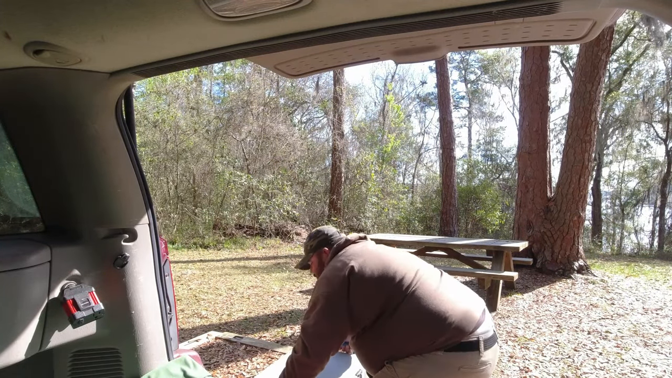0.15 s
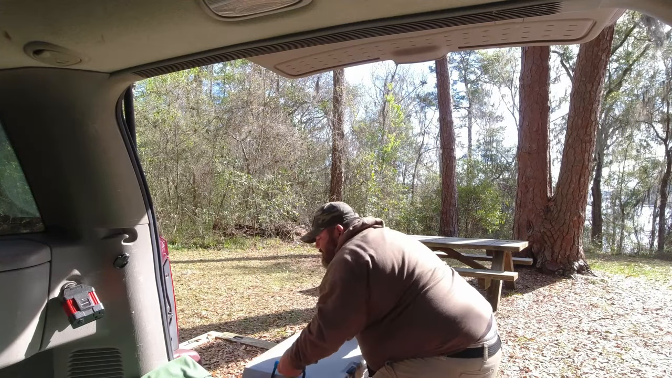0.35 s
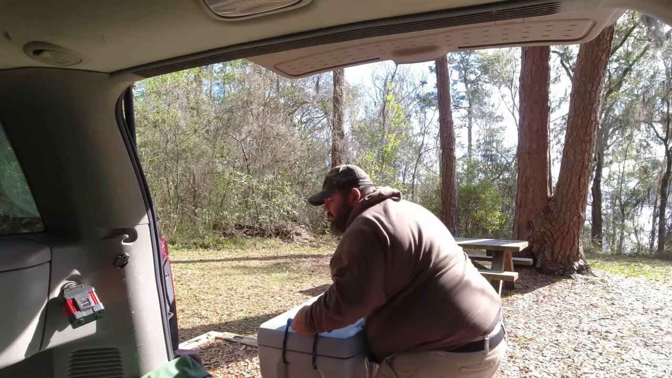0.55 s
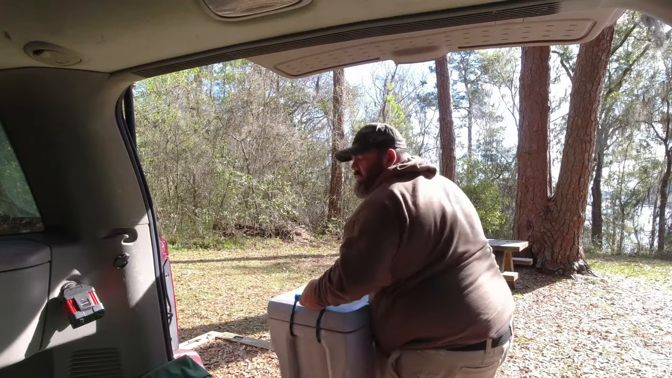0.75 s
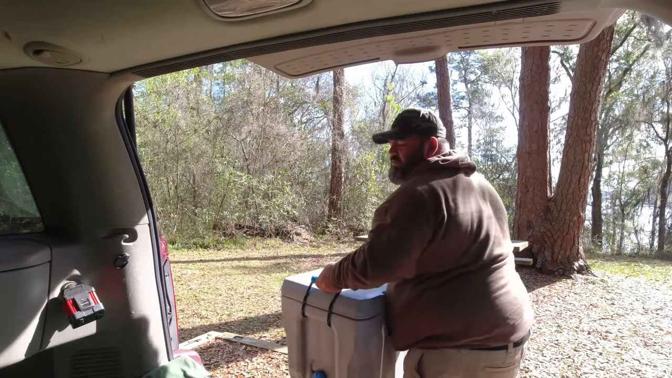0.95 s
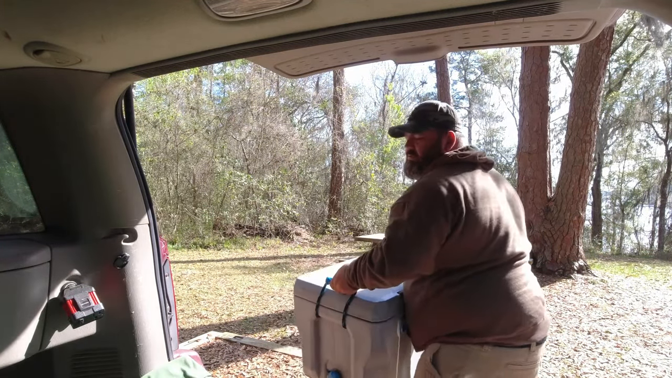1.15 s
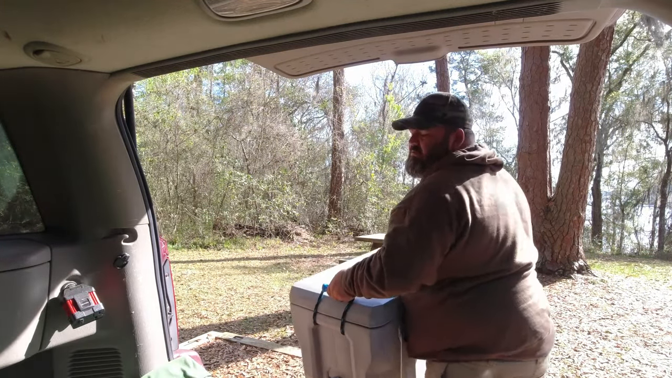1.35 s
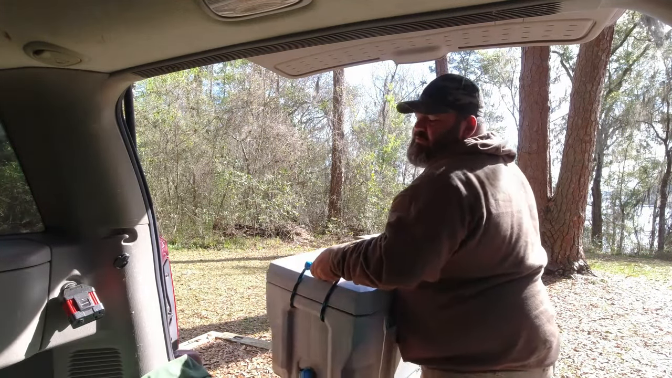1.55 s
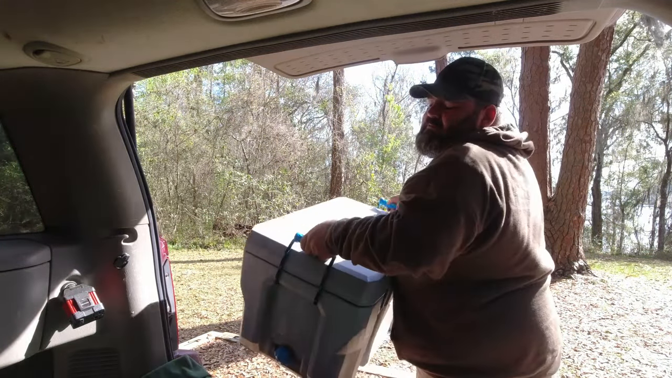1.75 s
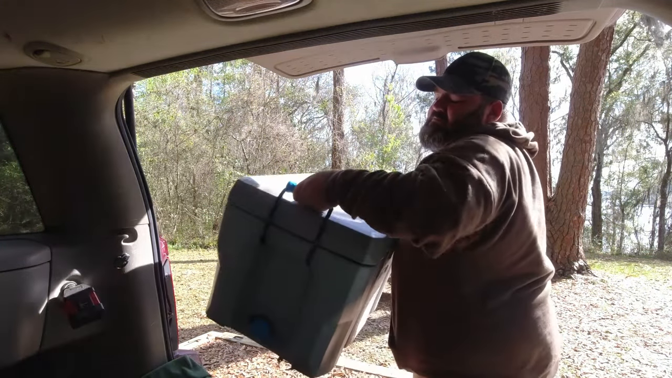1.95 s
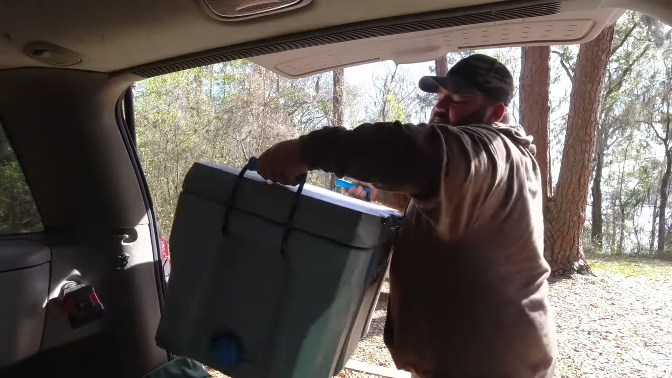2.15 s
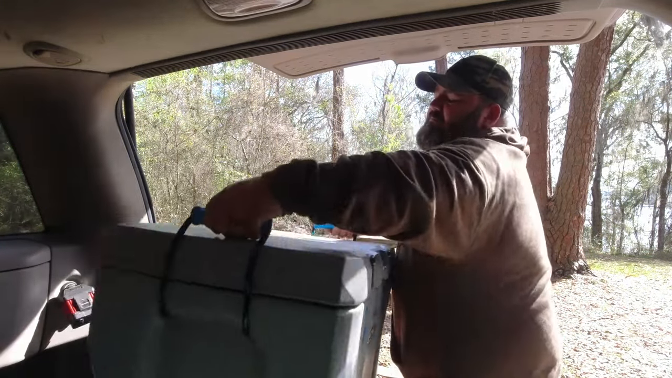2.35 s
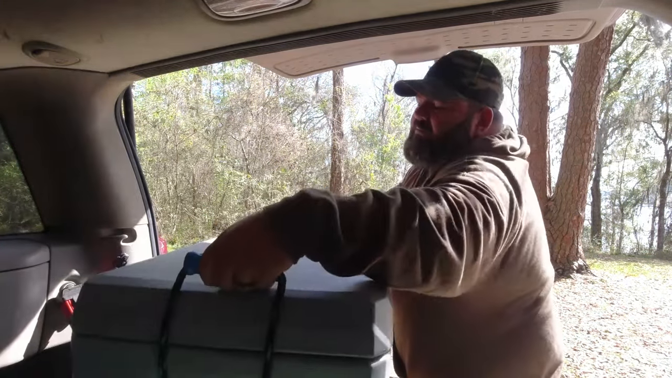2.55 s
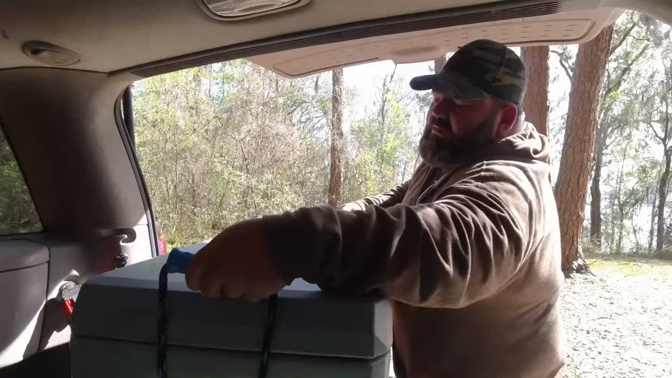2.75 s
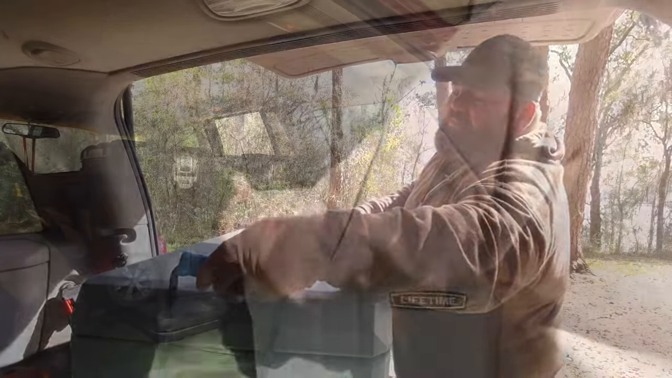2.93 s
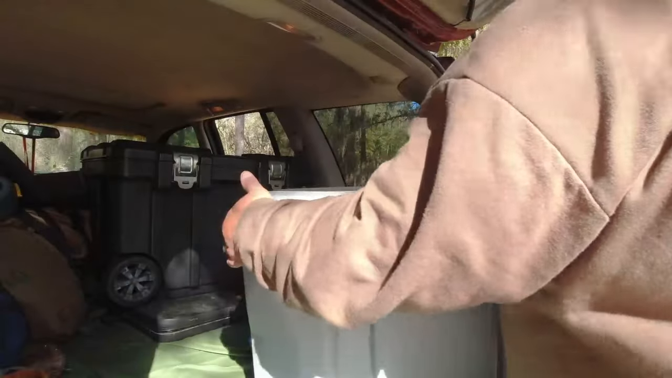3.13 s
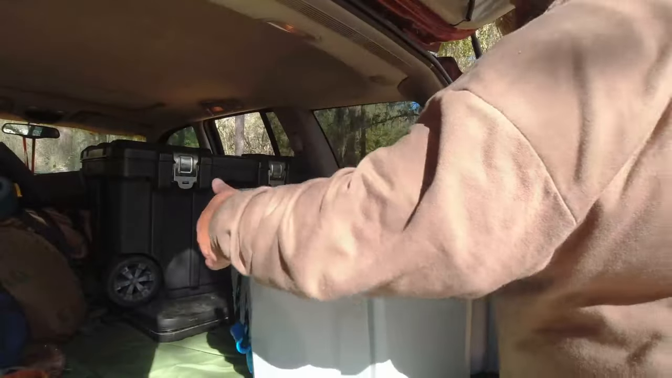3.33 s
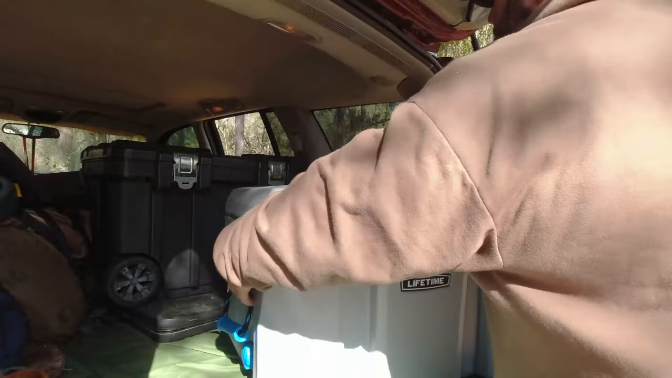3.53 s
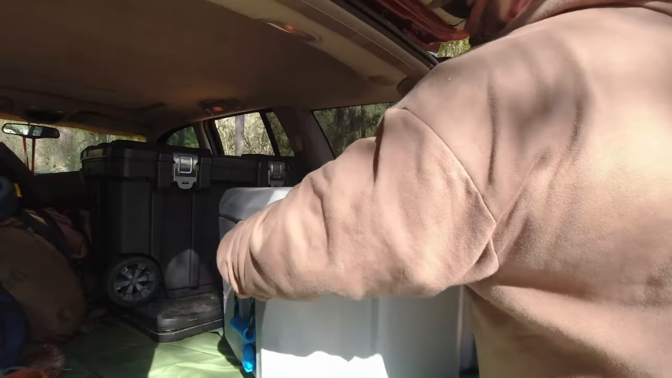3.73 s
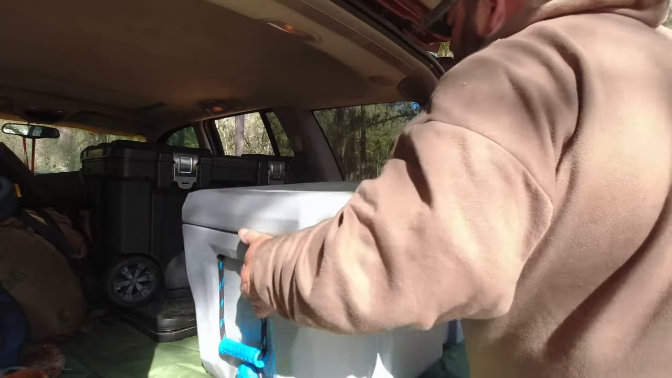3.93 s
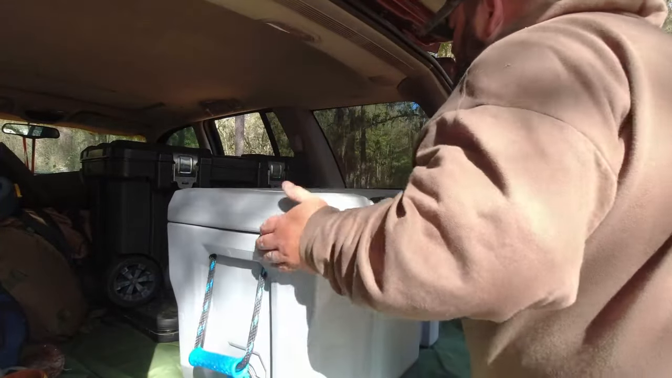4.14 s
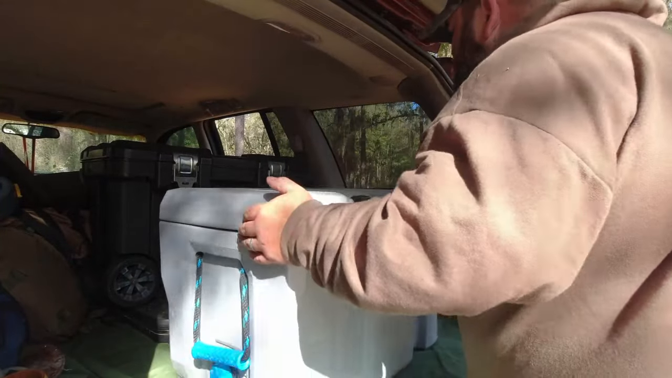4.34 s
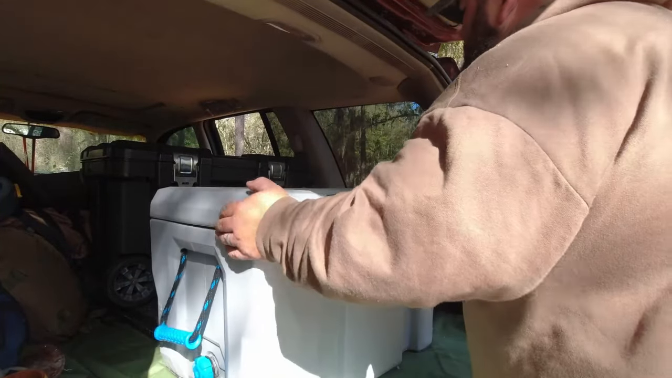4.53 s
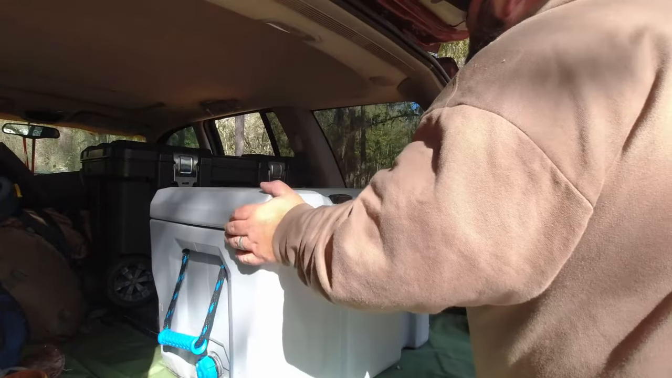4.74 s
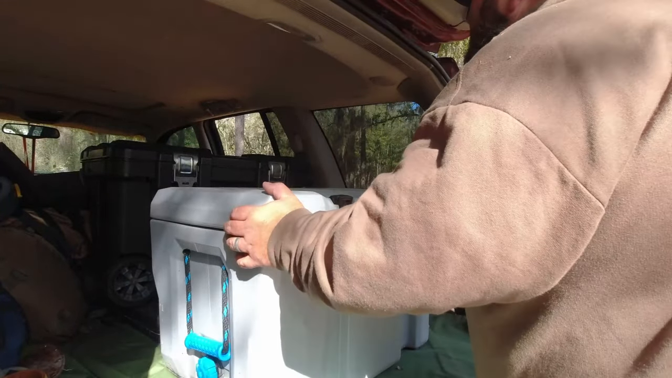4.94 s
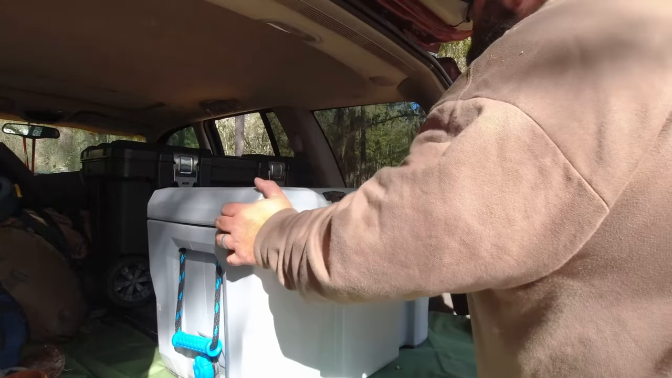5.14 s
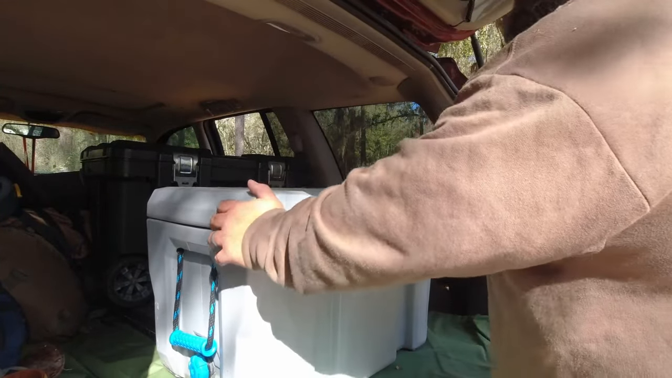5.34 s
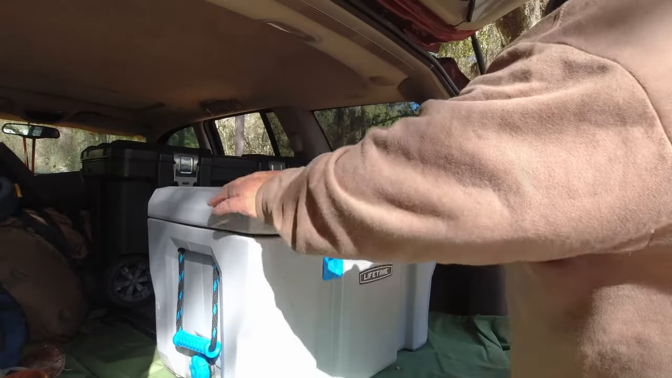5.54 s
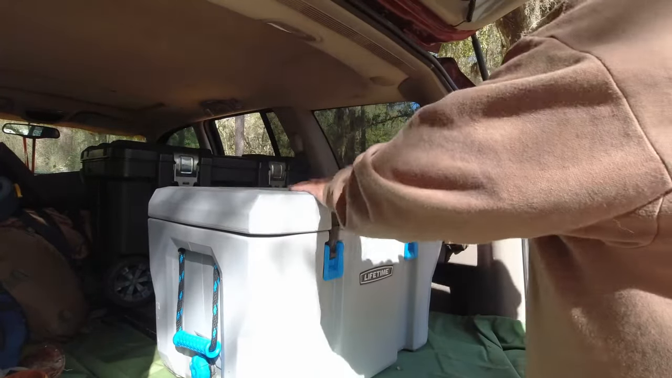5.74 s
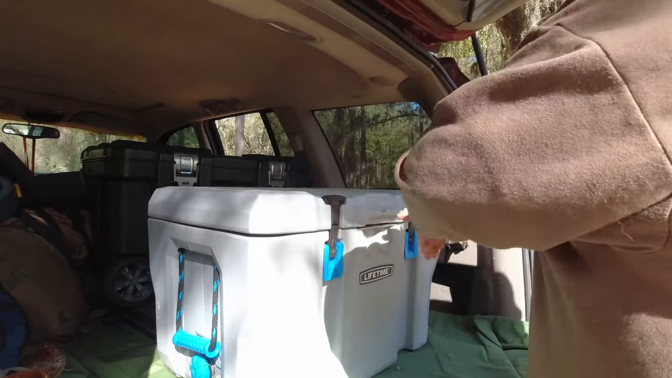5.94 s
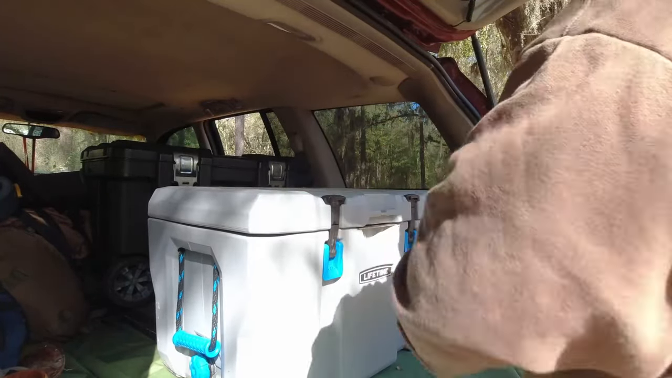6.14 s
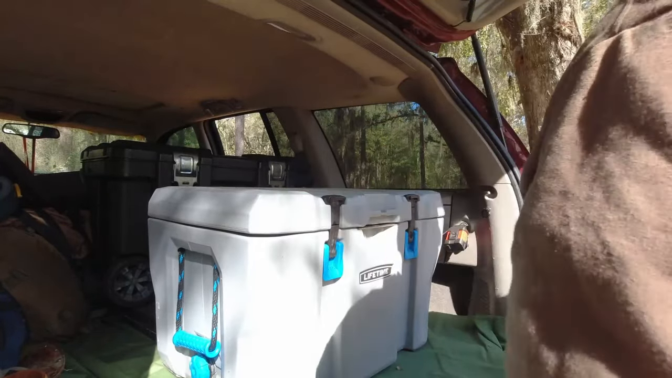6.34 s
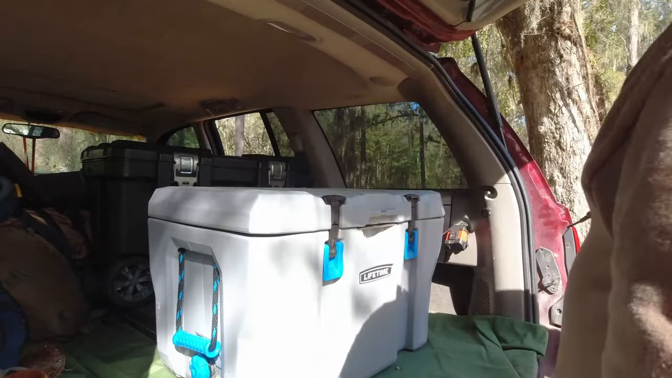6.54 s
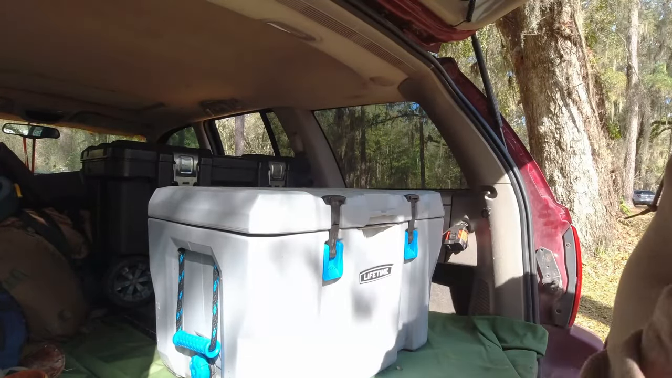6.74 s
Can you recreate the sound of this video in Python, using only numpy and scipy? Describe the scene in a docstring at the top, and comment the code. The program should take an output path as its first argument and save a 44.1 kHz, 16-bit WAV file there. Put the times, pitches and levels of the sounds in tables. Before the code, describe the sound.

A hollow plastic cooler is lifted, thuds heavily over a car sill, is dragged and knocked around inside, then faint hand brushing and birds.

```python
"""A hollow plastic cooler is lifted off the ground with thuds and knocks, over the hum of a far engine.
It bumps and scrapes over a car's sill and lands on the load floor; from 2.5 s a second place lies behind.
It is dragged round on a cloth while its handles knock on its walls; then hands brush it and birds sing.
Knocks and rubbing set off fading tones of the box, thuds are sagging low tones, cloth and air are
shaped noise, and the birds and the engine are gliding or wavering tones."""
import sys
import numpy as np
from scipy import signal
from scipy.fft import rfft, irfft, next_fast_len
from scipy.io import wavfile
from scipy.ndimage import uniform_filter1d

SR = 44100
rng = np.random.default_rng(int(sys.argv[2]) if len(sys.argv) > 2 else 0)


def gain_from_db(level_db):
    """Turn a decibel level (scalar or array-like) into a linear amplitude factor."""
    decades = np.asarray(level_db, float) / 20
    return 10 ** decades


def bounce(signal):
    """Save signal as a 16-bit WAV file at the path given by the first command-line argument."""
    frames = np.transpose(np.atleast_2d(signal))
    limited = np.clip(frames, -1, 1)
    pcm = np.round(limited * 32767).astype(np.int16)
    wavfile.write(sys.argv[1], SR, pcm)


N = 298998  # length in samples


def evened(x):
    """Scales a signal to an average strength (rms) of 1."""
    return x / np.sqrt(np.mean(x ** 2) + 1e-20)


def add(mix, start_s, sound):
    """Mixes a sound in at its start time, cut off where the mix ends."""
    part = mix[round(start_s * SR):][:len(sound)]
    part += sound[:len(part)]


def colour(x, points):
    """Makes each pitch range louder or softer, following (frequency [Hz], level [dB]) points."""
    size = next_fast_len(len(x) + 4096)
    hz, db = np.transpose(points)
    bins_hz = np.fft.rfftfreq(size, 1 / SR)
    gain = gain_from_db(np.interp(np.log(bins_hz + 1), np.log(hz + 1), db))
    return irfft(rfft(x, size) * gain, size)[:len(x)]


def patchy(x, depth_db):
    """Random patches of time and pitch swell and sink."""
    z = signal.stft(x, nperseg=512, noverlap=384)[2]
    over_time = uniform_filter1d(rng.standard_normal(z.shape), size=14, axis=1)
    patches = uniform_filter1d(over_time, size=5, axis=0)
    return signal.istft(z * gain_from_db(depth_db * evened(patches)), nperseg=512, noverlap=384)[1][:N]


def warbles(rows, smooth, spread):
    """Sliding tones whose pitch shakes at random by a share (spread) of itself."""
    out = np.zeros(N)
    for start_s, length_s, from_hz, to_hz, db in rows:
        glide_hz = np.linspace(from_hz, to_hz, round(length_s * SR))
        shake = evened(uniform_filter1d(rng.standard_normal(SR // 2), smooth))[:len(glide_hz)]
        hz = glide_hz * (1 + spread * shake)
        tone = np.sin(2 * np.pi * np.cumsum(hz) / SR)
        add(out, start_s, gain_from_db(db) * tone * signal.windows.tukey(len(hz), 0.7))
    return out


# The tones of the hollow box:
# (frequency [Hz], level [dB], time to fade by 60 dB before extra damping [s])
BOX_TONES = [(236.4, -10.5, 0.24), (369, 2.5, 0.096), (462.2, -13, 0.13), (535, 5.5, 0.042),
             (678.5, 11, 0.038), (783, 0, 0.038), (922.5, 7, 0.036), (1090, 5.5, 0.048), (1291, 4, 0.033),
             (1410, 8.5, 0.0083), (1627, -13.5, 0.02), (1780, 2, 0.016), (2110, -11, 0.057),
             (3020, -3.5, 0.038), (3300, -1.5, 0.017)]


def ring(weights_db, detune, damping):
    """The box answers one soft-edged tap: its tones, each split into a close pair, fade away together."""
    hz, db, t60 = np.transpose(BOX_TONES)[:, :, None]
    t = np.arange(5000) / SR
    upper = np.sin(2 * np.pi * hz * (1 + detune[:, None]) * t)
    lower = np.sin(2 * np.pi * hz * (1 - detune[::-1, None]) * t)
    fade = gain_from_db(db + weights_db[:, None] - 60 * damping * t / t60)
    tones = fade * (upper + 2.8 * lower) * (1 - np.exp(-t / 0.00052))
    band = signal.butter(4, [170, 5500], "bandpass", fs=SR, output="sos")
    return signal.sosfilt(band, tones.sum(0))


# Knocks on the walls:
# (time [s], peak level of the ringing [dB], favoured tone [Hz], hardness [dB])
WALL_KNOCKS = [(0.776, -55, 1070, -26), (0.874, -37, 364, -39), (0.891, -38.5, 1065, -40),
               (0.908, -35, 625, -30), (0.924, -41, 765, -27.5), (1.397, -40, 1120, -39),
               (1.447, -46, 336, -16), (1.473, -43.5, 1090, -23), (1.696, -31, 301, -4.5),
               (1.733, -27.5, 1090, -1), (1.855, -25.5, 410, -24.5), (1.882, -32, 864, -20),
               (1.917, -32.5, 1100, -11), (1.928, -32.5, 1090, -9.5), (2.225, -81.5, 1090, 20),
               (2.389, -24, 1090, -25), (2.451, -27, 318, -26), (2.487, -22.5, 570, -35),
               (2.56, -22, 684, -16.5), (2.731, -28.5, 443, -35), (2.833, -36, 386, -40.5),
               (2.905, -32, 574, -31), (3.061, -30, 663, -28), (3.324, -31, 634, -32.5),
               (3.526, -19.5, 394, -51), (3.549, -14, 443, -19.5), (3.643, -29.5, 390, -17),
               (3.743, -21.5, 410, -38), (3.796, -18, 590, -18.5), (3.823, -28.5, 692, -23),
               (3.834, -21.5, 643, -23), (4.154, -27, 355, -18), (4.233, -17, 782, -19),
               (4.271, -13.5, 495, -24), (4.482, -14.5, 617, -9), (4.502, -26.5, 722, -36.5),
               (4.589, -14.5, 884, -20.5), (4.646, -20.5, 484, -24.5), (4.735, -34.5, 469, -66),
               (4.833, -48.5, 716, -3.5), (4.936, -18.5, 784, -14.5), (4.971, -26.5, 600, -19),
               (4.983, -17, 422, -10), (6.155, -47, 1090, -24), (6.605, -45.5, 1090, -49),
               (6.661, -43.5, 1090, -12.5)]
# Hiss of the rough surface, in knocks and in rubbing: (frequency [Hz], level [dB])
SURFACE_HISS = [(530, -17.5), (900, -23), (1040, -21.5), (1240, -1.5), (2630, -1), (3200, -2), (5550, -19),
                (7500, -50), (9750, -77.5), (16500, -120)]
# The dense dull body of a knock: (frequency [Hz], level [dB])
KNOCK_BODY = [(90, -24), (200, 3.5), (500, 9), (1200, 2.5), (2200, -32.5), (5000, -59)]
# The bright edge of a knock: (frequency [Hz], level [dB])
KNOCK_EDGE = [(1200, -14), (3000, 11.5), (5500, -9.5), (7000, -39), (9000, -8.5), (10500, -43.5),
              (16000, -64.5)]


def knocks():
    """Each knock is a few quick contacts; its spot favours one tone, hard blows wake the high ones."""
    out, hz = np.zeros(N), np.transpose(BOX_TONES)[0]
    t = np.arange(1500) / SR
    crack_fade = (1 - np.exp(-t / 0.005)) * gain_from_db(-60 * t / 0.024)
    body_fade = (1 - np.exp(-t / 0.0011)) * gain_from_db(-60 * t / 0.061)
    edge_fade = np.sin(np.pi / 2 * np.minimum(t / 0.00065, 1)) ** 2 * gain_from_db(-60 * t / 0.015)
    for start_s, db, ring_hz, hard_db in WALL_KNOCKS:
        near = np.exp(-(np.log2(hz / ring_hz) / 0.11) ** 2)
        spot_db = 14.5 * near + 0.79 * (rng.random(len(hz)) - 0.5)
        tilt_db = (hard_db + 27.5) * np.clip(np.log2(hz / 1000) / 3.5, 0, 1.5)
        detune = 0.22 * (rng.random(len(hz)) - 0.5)

        # One main contact and five random ones within 6.5 ms; soft blows press longer
        taps = np.zeros(2000)
        taps[0] = 0.75
        delays = (0.0065 * SR * rng.random(5)).astype(int) + 1
        taps[delays] = 1.5 * (rng.random(5) - 0.5)
        press = np.hanning(4.5 + round(np.clip(-0.4 * hard_db, 3, 30)))
        sound = signal.fftconvolve(np.convolve(taps, press), ring(spot_db + tilt_db, detune, 1.44))
        add(out, start_s, gain_from_db(db) * sound / abs(sound).max())

        # The contact itself pushes air once; harder means shorter
        click = np.diff(np.hanning(round(SR * 0.0007 * max(1 - hard_db / 20, 0.5))))
        add(out, start_s + 0.001073, -gain_from_db(db - 3) * click / click.max())

        # The surface cracks with a short clatter; hard blows start with a bright snap
        noise = rng.standard_normal(1500)
        crack = evened(colour(noise, SURFACE_HISS)) * crack_fade
        edge = evened(colour(noise, KNOCK_EDGE)) * edge_fade
        body = evened(colour(noise, KNOCK_BODY)) * body_fade
        add(out, start_s, gain_from_db(db + hard_db + 4.5) * crack)
        add(out, start_s, gain_from_db(db + 1.6 * hard_db + 1.0) * edge)
        add(out, start_s, gain_from_db(db - 10.5) * body)
    return out


def cabin(x):
    """Short dense reflections inside the car, made by smearing the sound with fading noise."""
    t = np.arange(SR // 4) / SR
    tail = rng.standard_normal(len(t)) * gain_from_db(-60 * t / 0.058) * (t > 0.003)
    return x + gain_from_db(-7.5) * signal.oaconvolve(x, tail / np.linalg.norm(tail))[:N]


# The weight lands:
# (time [s], level of the low swing [dB], pitch it sags to [Hz], time to fade by 60 dB [s])
LANDINGS = [(0.688, -29.5, 98.9, 0.23), (0.689, -29, 155, 0.13), (0.69, -35, 268, 0.064),
            (0.749, -33, 224, 0.12), (0.743, -30.5, 104, 0.12), (1.699, -13.5, 73, 0.23),
            (1.744, -22, 69.6, 0.64), (1.783, -29, 34.86, 1.42), (2.447, -10, 103, 0.1),
            (2.475, -4, 52, 0.083), (2.54, -1.5, 60.8, 0.14), (2.634, -16, 45.1, 0.43),
            (2.67, -11.5, 123.5, 0.072), (2.743, -29.5, 34.4, 0.85), (3.502, -30.5, 55.5, 0.66),
            (3.575, -28, 37, 0.44), (3.923, -30, 57.7, 0.32), (4.142, -16, 95.5, 0.069),
            (4.157, -10.5, 53, 0.14), (4.201, -23.5, 33.6, 0.46), (5.83, -36, 112, 0.1)]


def thuds():
    """The load floor gives a few low swings that sag in pitch; a higher panel tone dies sooner."""
    out, t = np.zeros(N), np.arange(SR // 2) / SR
    for start_s, db, hz, t60 in LANDINGS:
        turns = hz * (t + 0.0032 * (1 - np.exp(-t / 0.0046)))
        low = np.sin(2 * np.pi * turns)
        panel = gain_from_db(-9.5 - 60 * t / t60) * np.sin(2 * np.pi * 2.1 * turns)
        add(out, start_s, -gain_from_db(db - 60 * t / t60) * (1 - np.exp(-t / 0.0043)) * (low + panel))
    return out


def grit(per_s, spread_db, smooth):
    """Friction comes as sparse slips of uneven size, over a share (smooth) of plain noise."""
    sizes = gain_from_db(spread_db * np.minimum(rng.exponential(1, N), 4)) * rng.choice([-1., 1.], N)
    slips = sizes * (rng.random(N) < per_s / SR)
    return evened(evened(slips) + smooth * rng.standard_normal(N))


# The heavy box scrapes over the car's sill, once against it and once in:
# two lists of (time [s], level of the wall groan [dB])
SILL_SCRAPES = [
    [(1.68, -72), (1.7, -29), (1.745, -29.5), (1.8, -28.5), (1.86, -37.5), (1.92, -40.5), (1.97, -48),
     (2.15, -59), (2.3, -72)],
    [(2.37, -56), (2.39, -57), (2.43, -45), (2.46, -35), (2.51, -30.5), (2.54, -36), (2.58, -31),
     (2.63, -36.5), (2.69, -35), (2.76, -49.5), (2.89, -63.5), (2.93, -84)],
]
# The box is dragged round on the cloth: (time [s], wall groan [dB], rubbing hiss [dB])
CLOTH_DRAG = [(2.88, -53, -65), (2.92, -44, -63.5), (2.981, -45, -55.5), (3.17, -46.5, -49),
              (3.24, -48, -59), (3.331, -49, -50), (3.45, -48, -55.5), (3.568, -37.5, -53.5),
              (3.63, -44, -66), (3.701, -55, -70.5), (3.87, -48.5, -61.5), (3.95, -47.5, -53),
              (4.079, -44.5, -44.5), (4.13, -46.5, -45), (4.179, -34.5, -50), (4.25, -42, -52),
              (4.331, -50, -60), (4.402, -48.5, -48), (4.52, -40, -53.5), (4.57, -44, -62),
              (4.7, -54.5, -72.5), (4.871, -71, -71.5)]
# Hands, sleeves and straps brush the box:
# (loudest time [s], length [s], wall groan [dB], rubbing hiss [dB], cloth fizz [dB])
HAND_BRUSHES = [(0.787, 0.13, -49, -73, -49.5), (0.913, 0.31, -45.5, -58.5, -52),
                (1.168, 0.25, -58, -71, -59.5), (1.393, 0.62, -63, -69.5, -74.5),
                (3.562, .08, -60.5, -59, -68), (4.12, 0.25, -52, -68, -68), (4.484, 0.11, -48.5, -56, -52),
                (4.914, 0.13, -52, -60.5, -99), (4.989, 0.082, -38.5, -65, -65),
                (5.297, 0.91, -65, -73.5, -100), (5.433, 0.21, -60, -86, -100),
                (5.849, 0.29, -54.5, -49.5, -65.5), (5.912, 0.15, -59, -55, -48.5),
                (6.126, 0.96, -61.5, -90, -102), (6.349, 0.3, -51, -82, -99),
                (6.564, 0.36, -48.5, -67, -82), (6.731, 1, -54, -92, -101)]


def contact():
    """Gains of groan, hiss, fizz and floor rumble: scrapes, drag and brushes add up in power."""
    t = np.arange(N // 64 + 2) * 64 / SR
    power = np.zeros((3, len(t)))
    for rows in SILL_SCRAPES:
        groan_db = np.interp(t, *np.transpose(rows), left=-120, right=-120)
        power += gain_from_db(groan_db + np.array([[0], [-11], [-13.5]])) ** 2  # groan, hiss, fizz
    drag_s, *drag_db = np.transpose(CLOTH_DRAG)
    power[:2] += [gain_from_db(np.interp(t, drag_s, db, left=-120, right=-120)) ** 2 for db in drag_db]
    weight = power[0].copy()  # only the box's own weight shakes the floor
    rise, edge_db, shape = 0.38, -22.5, 1.23  # share of the length spent rising; level at either end
    for peak_s, length_s, *levels_db in HAND_BRUSHES:
        away = abs(t - peak_s) / (length_s * np.where(t < peak_s, rise, 1 - rise))
        power += gain_from_db(np.array(levels_db)[:, None] + edge_db * away ** shape) ** 2
    return [np.interp(np.arange(N) / SR, t, np.sqrt(p)) for p in (*power, weight)]


# Rough short tones while the box is rubbed or dragged:
# (time [s], length [s], start pitch [Hz], end pitch [Hz], level [dB])
ROUGH_TONES = [(3.28, 0.24, 650, 580, -43), (.87, 0.13, 880, 740, -59)]
# Spectrum of the fizz: (frequency [Hz], level [dB])
FIZZ_SPECTRUM = [(3530, -9), (6000, -14), (7270, -16.5), (9020, -3.5), (11200, -17), (12100, -36),
                 (13100, -12), (15200, -18.5), (15900, -30)]
# Rumble of the load floor: (frequency [Hz], level [dB])
FLOOR_RUMBLE = [(18, -45.5), (30, -6), (64, 5), (103, -5), (250, 1), (320, -65.5), (550, -120)]


def handling():
    """Slips ring the held walls at different spots and shake the load floor; cloth hisses and fizzes."""
    t, walls = np.arange(N) / SR, np.zeros(N)
    flutter = uniform_filter1d(uniform_filter1d(rng.standard_normal(N), size=130), size=130)
    chatter = evened(gain_from_db(1.5 * evened(flutter)))  # the contact skips in bursts of a few ms
    groan, hiss, fizz, rumble = contact()
    groan, hiss, fizz = groan * chatter, hiss * chatter, fizz * chatter

    # Rubbing hardly wakes the high tones
    dull_db = -5.0 * np.clip(np.log2(np.transpose(BOX_TONES)[0] / 800), 0, None)
    for shift in rng.uniform(-1, 1, (4, len(BOX_TONES))):  # four spots
        tap = ring(dull_db, 0.1 * shift, 1.6)
        walls += signal.oaconvolve(groan * grit(60, 0.89, 1.0), tap / np.linalg.norm(tap) / 2)[:N]
    loaded = np.clip((4.45 - t) * 10, 0.1, 1)  # the base stops sliding just before 4.45 s
    walls -= (1 - loaded) * uniform_filter1d(walls, size=30)  # a light touch leaves the low tones still

    rubbing = hiss * evened(colour(grit(500, 0.83, 3.44), SURFACE_HISS))
    cloth = evened(colour(grit(1300, 0.81, 1.0), FIZZ_SPECTRUM))
    dull = signal.sosfiltfilt(signal.butter(6, 10600, fs=SR, output="sos"), cloth)
    # The range above about 10.6 kHz fades out as the fizz gets weaker
    cloth = dull + np.minimum(fizz / gain_from_db(-52.5), 1) * (cloth - dull)
    floor = gain_from_db(0.5) * loaded * rumble * evened(colour(rng.standard_normal(N), FLOOR_RUMBLE))
    rough_tones = warbles(ROUGH_TONES, smooth=120, spread=0.15)
    return patchy(walls + rough_tones + rubbing + fizz * cloth + floor, depth_db=2.5)


# Hooked chirps: (time [s], length [s], direction [1 falling, -1 rising], level at the top [dB])
HOOKED_CHIRPS = [(5.158, 0.011, 1, -59.5), (5.188, 0.014, 1, -75), (5.347, 0.023, 1, -59.5),
                 (5.375, 0.0094, 1, -63), (5.428, 0.019, -1, -58), (5.448, 0.018, -1, -59),
                 (5.538, 0.023, 1, -58), (5.564, 0.011, 1, -61), (5.627, 0.0185, -1, -59),
                 (5.641, 0.02, -1, -57), (5.74, .022, 1, -71.5), (5.765, 0.017, 1, -64)]
# Thin buzzing notes: (time [s], length [s], start pitch [Hz], end pitch [Hz], level [dB])
BUZZING_NOTES = [(5.32, 0.041, 7100, 7060, -72), (5.47, 0.14, 7400, 7500, -71.5),
                 (5.7, 0.039, 6860, 7240, -60.5), (6.02, 0.066, 7700, 7750, -74),
                 (6.105, 0.077, 6810, 6830, -64), (6.295, 0.14, 7990, 7140, -53.5),
                 (6.43, .19, 7620, 7960, -72.5)]
# Plain whistles: (time [s], length [s], start pitch [Hz], end pitch [Hz], level [dB])
PLAIN_WHISTLES = [(5.227, 0.11, 7300, 7100, -77), (6.22, 0.1, 5580, 5700, -78),
                  (6.515, 0.06, 3300, 4860, -67.5)]


def birds():
    """Hooked chirps, plain whistles and fast-warbled buzzes, with the echo of the trees behind them."""
    out = warbles(BUZZING_NOTES, smooth=40, spread=0.025)
    out += warbles(PLAIN_WHISTLES, smooth=400, spread=0.0036)
    top_hz, foot_hz, foot_db = 4980, 3500, -5.5
    for start_s, length_s, way, db in HOOKED_CHIRPS:
        down = np.linspace(0, 1, round(length_s * SR)) ** 2  # squaring makes it dwell at the top
        down = down[::1 if way > 0 else -1]
        rasp_hz = 130 * evened(uniform_filter1d(rng.standard_normal(2000), size=50))[:len(down)]
        hz = top_hz + (foot_hz - top_hz) * down + rasp_hz
        level = gain_from_db(db + foot_db * down) * signal.windows.tukey(len(hz), 0.4)
        add(out, start_s, level * np.sin(2 * np.pi * np.cumsum(hz) / SR))
    t = np.arange(SR // 2) / SR
    tail = rng.standard_normal(len(t)) * gain_from_db(-60 * t / 0.32) * (t > 0.008)
    echo = signal.oaconvolve(out, tail / np.linalg.norm(tail))[:N]
    return out + gain_from_db(-5.5) * patchy(echo, depth_db=6.0)


# Low tones of the far engine: (average pitch [Hz], middle level at the first place [dB])
ENGINE_HUM = [(59.2, -64.5), (91.5, -63.5)]


def engine():
    """A far engine's low tones, which waver slowly in pitch and level together."""
    out = np.zeros(N)
    for hz, db in ENGINE_HUM:
        waver = evened(uniform_filter1d(rng.standard_normal(N), 6000))
        tone = np.sin(2 * np.pi * np.cumsum(hz + 0.43 * waver) / SR)
        out += np.sqrt(2) * gain_from_db(db + 1.5 * waver) * tone
    return out


# Woodland air at the first place: (frequency [Hz], relative level [dB])
FIRST_AIR = [(12, -22), (20, 2.5), (100, 1), (439, -24.5), (1020, -24.5), (3350, -34.5), (11000, -52),
             (14300, -100), (22000, -120)]
# Woodland air at the second place: (frequency [Hz], relative level [dB])
SECOND_AIR = [(12, -25.5), (20, 19), (211, 15), (895, 2), (1050, -3), (1170, -3.5), (5670, -13),
              (12000, -32.5), (15600, -89.5), (22000, -120)]


def air():
    """Woodland background: shaped noise of either place; the engine is weaker at the second."""
    second = np.clip((np.arange(N) / SR - 2.5) / 0.064 + 0.5, 0, 1)  # quick crossfade around 2.5 s
    hum = engine()
    first_place = gain_from_db(-57.5) * evened(colour(rng.standard_normal(N), FIRST_AIR)) + hum
    second_air = gain_from_db(-62.5) * evened(colour(rng.standard_normal(N), SECOND_AIR))
    return (1 - second) * first_place + second * (second_air + gain_from_db(-7.0) * hum)


def scene():
    """All sources, as they reach the microphone pair."""
    middle = cabin(knocks()) + thuds() + handling() + birds() + air()
    return np.array([middle, middle])


# How strongly the microphone picks up each pitch: (frequency [Hz], level [dB])
MICROPHONE_TONE = [(20, -1), (2700, -1), (3050, -1), (3330, 5.5), (3600, -1), (3900, -2.5), (4400, 1.5),
                   (5200, -1.5), (22000, -9)]


def microphone(dry):
    """The microphone's housing rings near 3 kHz, which lifts a narrow band there."""
    return np.array([colour(channel, MICROPHONE_TONE) for channel in dry])


# Left-right difference against the middle: (frequency [Hz], level [dB])
SIDE_LEVELS = [(60, -20.5), (240, -27.5), (950, -15), (3770, -2), (15000, -1)]


def capsule_difference(middle):
    """Close capsules agree in the bass; a phase-scattered copy makes them differ toward the treble."""
    z = signal.stft(middle, nperseg=512, noverlap=384)[2]
    wander = evened(uniform_filter1d(rng.standard_normal(z.shape), 4, axis=1))
    scattered = signal.istft(1j * z * np.exp(1.7j * wander), nperseg=512, noverlap=384)[1][:N]
    return colour(evened(scattered), SIDE_LEVELS) * np.sqrt(np.mean(middle ** 2))


def roll_off(x):
    """The treble ends steeply here."""
    return signal.sosfilt(signal.butter(12, 16040, fs=SR, output="sos"), x)


def record(dry):
    """The microphone pair hears the scene; the capsules' difference goes to left and right oppositely."""
    heard = microphone(dry)
    side = capsule_difference(heard[0])
    mix = heard + np.array([side, -side])
    return roll_off(mix)


dry = scene()
out = record(dry)
bounce(out)
```